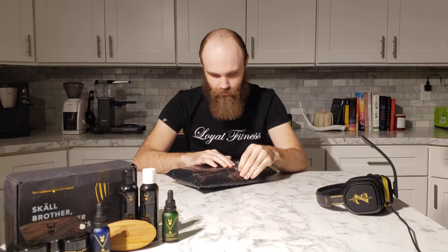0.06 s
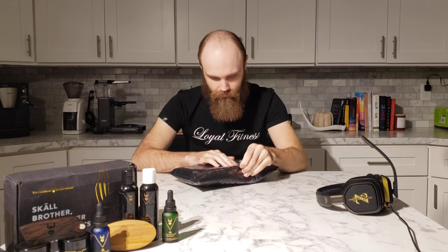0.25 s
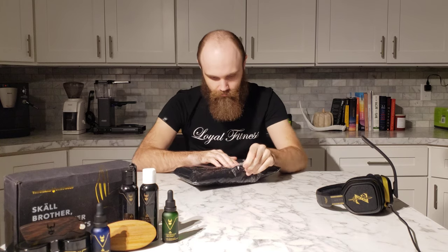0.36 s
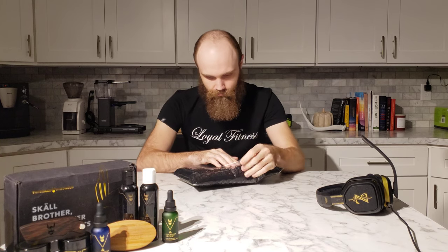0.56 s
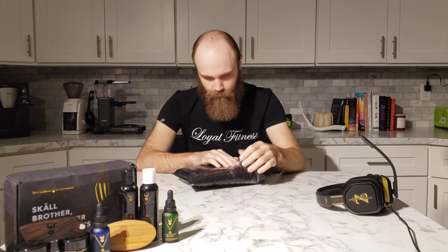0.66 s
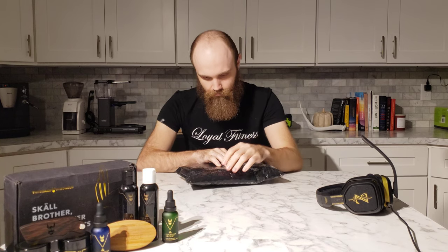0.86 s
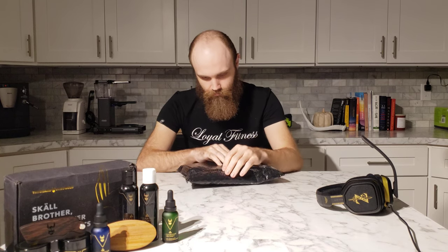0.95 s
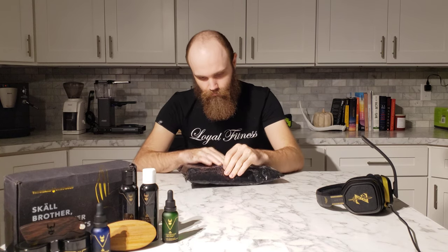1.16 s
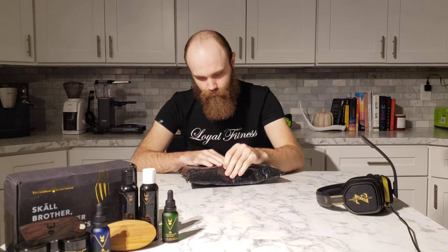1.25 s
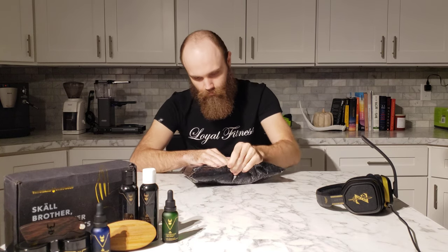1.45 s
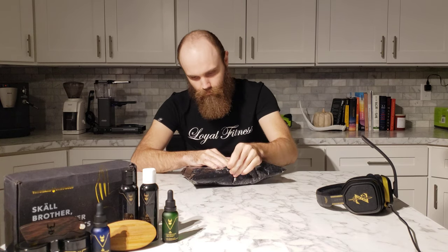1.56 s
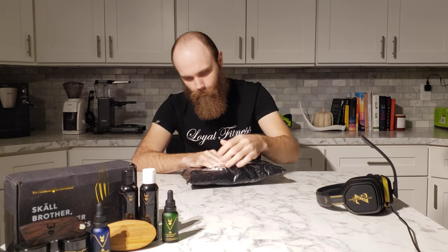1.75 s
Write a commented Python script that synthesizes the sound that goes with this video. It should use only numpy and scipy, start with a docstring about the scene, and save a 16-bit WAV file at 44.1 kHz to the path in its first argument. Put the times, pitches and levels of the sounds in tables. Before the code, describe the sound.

A plastic mailer bag is gripped and pulled: soft rustling and dull pops, a burst of sharp crackling snaps, a quieter stretch of tiny ticks, then another burst; close microphone with short hard kitchen echo.

```python
"""Hands grip and pull at a plastic mailer bag on a kitchen counter: noise slides and tiny clicks crinkle throughout.
Slack panels soon flop over with dull pops, as decaying tones of sagging pitch; faint snaps and dry ticks follow.
After 0.24 s creases buckle in a cluster of sharp snaps, coloured noise bursts that jolt the film,
and a taut panel twice twangs in decaying modes. A sparse stretch leads to a second cluster of snaps
at 1.3 to 1.5 s, then late flops and a faint snap. Decaying noise gives the hard kitchen's echo."""
import sys
import numpy as np
from scipy import signal
from scipy.fft import rfft, irfft
from scipy.io import wavfile
from scipy.ndimage import uniform_filter1d, minimum_filter1d

SR = 44100
rng = np.random.default_rng(int(sys.argv[2]) if len(sys.argv) > 2 else 0)


def unload_audio(sound):
    """Save the sound as a 16-bit wav file, at the path given as the first command line argument."""
    columns = np.transpose(np.atleast_2d(sound))
    # keep every value between -1 and 1, then stretch to whole-number steps
    steps = np.round(np.clip(columns, -1, 1) * 32767)
    wavfile.write(sys.argv[1], SR, steps.astype(np.int16))


N = 79380  # samples: 1.8 s

# Levels of short sounds compare their energy with that of 1 ms at rms 1.
# Buckling creases: (time [s], crack level [dB], ring of the crease [Hz], brightness [dB/octave],
# jolt of the film [dB])
CREASE_SNAPS = [ (0.0631, -39.5, 13600, -6, -36), (0.1682, -25.5, 11800, 1, -33),
                (0.2362, -30, 3800, -1, -32), (.2450, -17, 2750, -2.5, -18), (0.2475, -11.5, 7300, 0, -17),
                (0.2497, -8, 7300, 2.5, -11.5), (0.258, -6.5, 7100, 0, -11.5), (.3510, -2, 7170, 1, -46),
                (0.3622, -14.5, 2520, 0.5, -14), (0.3833, -3, 7000, -3.5, -8.5),
                (0.3874, -9.5, 8600, -4.5, -6.5), (.3890, -7.5, 6900, -1, -7.5),
                (0.3906, -12.5, 8900, -3.5, -12), (0.3926, -5.5, 9040, 4, -7.5),
                (0.671, -47, 9000, 6, -35.5), (0.7014, -39.5, 3940, 0.5, -30.5),
                (1.081, -35, 5900, -0.5, -39), (1.1297, -37, 5960, -2.5, -37.5),
                (1.3078, -27.5, 5000, -1, -33), (1.3111, -27, 6700, 0.5, -30), (1.342, -14, 6100, 0.5, -23),
                (1.3451, -9, 6100, -3, -13.5), (1.3523, -9.5, 3050, 1, -16.5), (1.4028, -11, 2580, -2, -13),
                (1.4051, -8.5, 2500, -0.5, -7.5), (1.4096, -7.5, 6030, -4.5, -14),
                (1.4125, -10, 7200, 3, -25), (1.4314, -4, 1850, 0, -5.5), (1.4583, -17.5, 8200, -0.5, -6),
                (1.4613, -4.5, 7000, -1.5, -2.5), (1.7570, -25, 3150, 3, -42)]
# Spectrum of a cracking crease: (frequency [Hz], relative level [dB])
CRACK_SPECTRUM = [(200, -32), (1000, -20), (2200, -3.5), (4500, -4.5), (7500, -2.5), (10000, -9),
                  (13500, -3.5), (16000, -16.5)]
# Spectrum of sliding friction: (frequency [Hz], relative level [dB])
SLIDE_SPECTRUM = [(60, 2), (150, -2), (330, 1), (680, 4), (1300, -2.5), (2500, -10), (7000, -13.5),
                  (15500, -17)]
CRACK_DECAY_S, JOLT_DECAY_S = 0.00038, 0.00071
PANEL_RISE_S = 0.00038  # onset of flops and twangs


def amp(db):
    """Amplitude ratio: 20 dB per factor of ten."""
    return 10 ** (np.asarray(db) / 20)


def evened(x):
    """Power normalization to rms 1."""
    return x / np.sqrt(np.mean(x ** 2) + 1e-20)


def packed(x):
    """Energy normalization to that of one millisecond at rms 1."""
    return x / np.linalg.norm(x) * np.sqrt(SR / 1000)


def read(points, hz, axis=1):
    """Linear interpolation of a table column on a log-frequency axis."""
    table = np.transpose(points)
    return np.interp(np.log(hz + 1), np.log(table[0] + 1), table[axis])


def add(mix, s, sound):
    """Superposition: a sound joins the mix, in place, at time s [s]."""
    part = mix[max(round(s * SR), 0):][:len(sound)]
    part += sound[:len(part)]


def causal(db):
    """Minimum-phase response: folding the cepstrum packs the energy as early as these gains allow."""
    cepstrum = irfft(np.log(amp(db)))
    half = len(cepstrum) // 2
    cepstrum[1:half] *= 2
    cepstrum[half + 1:] = 0
    return np.exp(rfft(cepstrum))


def grid(size=2048):
    """Discrete time [s] and frequency [Hz] axes of one short sound."""
    return np.arange(size) / SR, np.fft.rfftfreq(size, 1 / SR)


def burst(db, decay_s):
    """Stick-slip: a flurry of tiny slips swells and dies within moments, coloured by the film."""
    evenness = 0.57  # 0 leaves the noise spectrum ragged, 1 nearly flattens it
    t, hz = grid()
    swell = np.sqrt(t) * np.exp(-t / decay_s)
    slips = rfft(rng.standard_normal(len(t)) * swell)
    magnitude = abs(slips)
    slips /= (magnitude + magnitude.mean() / 10) ** evenness
    coloured = irfft(slips * causal(db))
    return packed(np.roll(coloured, len(t) // 128))  # a short lead keeps the wrapped onset


def noise(spectrum):
    """Spectral shaping of steady random noise, at rms 1."""
    gain = amp(read(spectrum, np.fft.rfftfreq(N, 1 / SR)))
    return evened(irfft(rfft(rng.standard_normal(N)) * gain, N))


def handling(axis):
    """Amplitude modulation: gain over time from one column of the handling curve."""
    # Strength of the handling: (time [s], crinkle level [dB], sliding level [dB])
    curve = [(0, -51, -53.5), (.09, -57.5, -62), (0.188, -47.5, -52), (.3, -47, -47.5), (.42, -42.5, -50.5),
             (0.631, -55.5, -51), (0.718, -54, -50), (.84, -65, -63), (0.962, -60.5, -56.5),
             (1.05, -73, -58.5), (1.172, -56.5, -57), (1.28, -54, -59), (1.461, -33, -57), (1.62, -52, -49),
             (1.8, -51, -48)]
    table = np.transpose(curve)
    return amp(np.interp(np.arange(N) / SR, table[0], table[axis]))


def hush():
    """Stationary background noise of the room."""
    # Spectrum of the hush: (frequency [Hz], relative level [dB])
    hush_spectrum = [(20, 1.5), (38, 0), (85, -8), (150, 1.5), (300, -15), (16000, -38)]
    return amp(-69.5) * noise(hush_spectrum)


def sliding():
    """Sliding friction: fingers and bag rub softly as broadband noise."""
    return noise(SLIDE_SPECTRUM) * handling(axis=2)


def wrinkle(centre_hz):
    """Band-limited impulse: the dry tick of one small wrinkle, in the band set by its size."""
    half_width = 0.69  # octaves to the -6 dB points
    t, hz = grid()
    octaves = np.log2((hz + 1) / centre_hz)
    band = -20 * np.log10(1 + (octaves / half_width) ** 4)
    return burst(read(CRACK_SPECTRUM, hz) + band, CRACK_DECAY_S / 2)


def crinkles(count=30):
    """Poisson-like crackling: still smaller wrinkles give way at random while the bag is handled."""
    # Spectrum of the crinkling: (frequency [Hz], relative level [dB])
    crinkle_spectrum = [(700, 1.5), (2500, -12), (6000, 0.5), (9000, -8), (14500, -3)]
    rate_per_s, spread_db = 900, 5.5  # total rate over all bands; spread per unit of random size
    out = np.zeros(N)
    for centre_hz in np.geomspace(crinkle_spectrum[0][0], crinkle_spectrum[-1][0], count):
        happens = rng.random(N) < rate_per_s / count / SR
        size = np.minimum(rng.exponential(1, N), 2.6)
        clicks = happens * amp(spread_db * size + read(crinkle_spectrum, centre_hz))
        out += signal.oaconvolve(clicks, wrinkle(centre_hz))[:N]
    return evened(out) * handling(axis=1)


def flops():
    """Damped oscillation: a slack panel swings briefly with a rustle, its pitch sagging as it relaxes."""
    # Slack panels flopping over, and at 0.868 s a soft low rub of the bag: (time [s], level before doubling the
    # amplitude [dB], middle of the pitch glide [Hz])
    panel_flops = [(.011, -44, 730), (0.0673, -37.5, 700), (0.067, -41.5, 298), (.1559, -37, 1090),
                   (.1573, -32.5, 1020), (0.207, -26.5, 644), (0.2314, -30.5, 443), (.290, -32.5, 350),
                   (.5480, -41, 414), (0.57, -39.5, 640), (.7018, -34, 855), (0.7046, -37, 390),
                   (.7494, -38, 630), (.868, -51, 164), (0.9838, -43, 810), (1.084, -39, 750),
                   (1.1599, -41, 1000), (1.4690, -24, 820), (1.688, -41, 684), (1.7505, -35, 810),
                   (1.7579, -29.5, 720), (1.7606, -30.5, 700), (1.7578, -32.5, 356)]
    decay_cycles, sag, rustle_db = 0.88, 0.15, -12  # sag: fraction above and below the middle pitch
    out, (t, hz) = np.zeros(N), grid()
    for s, db, pitch_hz in panel_flops:
        tension = np.exp(-t * pitch_hz / decay_cycles)
        turns = np.cumsum(pitch_hz * (1 + sag * (2 * tension - 1))) / SR
        swing = np.sin(2 * np.pi * turns) * tension * (1 - np.exp(-t / PANEL_RISE_S))
        add(out, s, amp(db) * 2 * packed(swing))
        rustle = burst(read(SLIDE_SPECTRUM, hz) + read(CRACK_SPECTRUM, hz), JOLT_DECAY_S)
        add(out, s, amp(db + rustle_db) * 2 * rustle)
    return out


def snaps():
    """Buckling: each crease cracks and jolts the film; its resonance is heard only head-on.

    Rows: head-on, into the room."""
    # Spectrum of the film's jolt: (frequency [Hz], relative level [dB])
    jolt_spectrum = [(50, -36), (120, -23.5), (250, -9.5), (550, 1.5), (900, 4.5), (1300, 5), (1900, -6.5),
                     (3500, -14.5)]
    ring_db, ring_octaves = 10, 0.18  # height and width of the resonance
    out, (t, hz) = np.zeros((2, N)), grid()
    lead = len(t) // 128 / SR  # the lead that burst() puts before its onset
    for s, crack_db, ring_hz, brightness, jolt_db in CREASE_SNAPS:
        octaves = np.log2(np.maximum(hz, 1000) / ring_hz)  # tilt levels off below 1 kHz
        crack = burst(read(CRACK_SPECTRUM, hz) + brightness * octaves, CRACK_DECAY_S)
        resonance = causal(ring_db * np.exp(-(octaves / ring_octaves) ** 2))
        ringing = packed(irfft(rfft(crack) * resonance))
        jolt = amp(jolt_db) * burst(read(jolt_spectrum, hz), JOLT_DECAY_S)
        add(out[0], s - lead, amp(crack_db) * ringing + jolt)
        add(out[1], s - lead, amp(crack_db) * crack + jolt)
    return out


def ticks():
    """Local buckling: single wrinkles give way, too small to jolt the film."""
    # Single small wrinkles: (time [s], level [dB], centre of the band [Hz])
    small_wrinkles = [(.1066, -28.5, 6070), (0.5396, -31.5, 6160), (0.5687, -37, 11000), (.7485, -47, 2840),
                      (.789, -46, 7900), (0.796, -43, 8350), (0.921, -51, 13800), (.9375, -53.5, 11100),
                      (1.008, -50, 14000), (1.1508, -47, 6000), (1.169, -50, 9900), (1.2428, -49, 4000),
                      (1.261, -51, 7000), (1.2998, -42, 6500), (1.681, -38, 5000)]
    out = np.zeros(N)
    for s, db, centre_hz in small_wrinkles:
        add(out, s, amp(db) * wrinkle(centre_hz))
    return out


def panel():
    """Modal superposition: a taut panel flips through and twangs in its lowest bending modes."""
    # Taut panel flipping through: (time [s], gain on the modes [dB])
    flips = [(.2577, -10), (.3510, -1.5)]
    # Bending modes of the panel: (frequency [Hz], relative level [dB])
    modes = [(660, -7.5), (2170, -12), (4250, -20.5)]
    t60_s = 0.0089  # ring time to -60 dB
    out, (t, hz) = np.zeros(N), grid()
    swing = np.exp(-np.log(1000) * t / t60_s) * (1 - np.exp(-t / PANEL_RISE_S))
    twang = sum(amp(db) * packed(np.cos(2 * np.pi * mode_hz * t) * swing) for mode_hz, db in modes)
    for s, db in flips:
        add(out, s, amp(db) * twang)
    return out


def tail():
    """Diffuse reverberation: lumpy echoes from cupboards and tiles, each band with its own decay."""
    # Kitchen reverberation: (frequency [Hz], reverberation time [s], energy level of the tail [dB])
    reverberation = [(120, 0.24, -12.5), (440, 0.38, -7), (1100, 0.28, -6), (2860, 0.33, -6.5),
                     (7000, 0.39, -9.5), (15200, 0.25, -10)]
    lumps_db, build_s = 4.3, 0.0023  # unevenness (rms) and onset of the echoes
    lumps = amp(lumps_db * evened(uniform_filter1d(rng.standard_normal(SR), size=40)))
    echoes = evened(rng.standard_normal(SR) * lumps)
    hz, t, z = signal.stft(echoes, SR, nperseg=256)
    t60 = read(reverberation, hz)[:, None]
    level_db = read(reverberation, hz, axis=2)[:, None]
    unit_energy = np.sqrt(2 * np.log(1000) / t60 / SR)  # offsets the energy of a longer decay
    z *= amp(level_db - 60 * t / t60) * unit_energy
    decaying = signal.istft(z, SR, nperseg=256)[1][:SR]
    return decaying * np.minimum(np.arange(SR) / SR / build_s, 1)


def kitchen(x, count=3):
    """Convolution reverberation: partly shared tails take turns as each crease faces another way.

    Two discrete reflections come from near surfaces."""
    # Near surfaces: (delay [s], level [dB])
    near_surfaces = [(.007, -23), (0.0245, -18)]
    share = 0.4  # fraction of echo energy common to all facings
    facing = np.searchsorted([row[0] for row in CREASE_SNAPS], np.arange(N) / SR) % count
    common, out = tail(), np.zeros(N)
    for k in range(count):
        part = x * uniform_filter1d(1. * (facing == k), size=16)  # short crossfade
        echo = np.sqrt(share) * common + np.sqrt(1 - share) * tail()
        out += signal.fftconvolve(part, echo)[:N]
    for delay_s, db in near_surfaces:
        add(out, delay_s, amp(db) * x)
    return out


def scene():
    """Radiation limit: the bag is too small to radiate bass; echo, sliding and hush join it."""
    bag = snaps() + panel() + flops() + ticks() + crinkles()
    bass_cut = signal.butter(3, 135, "high", fs=SR, output="sos")  # Hz
    direct, spread = signal.sosfilt(bass_cut, bag)
    return (direct + kitchen(spread) + sliding() + hush())[None]


def record(dry):
    """Gain reduction and band limiting: a fast limiter holds the loudest snaps, then a low-pass."""
    ceiling, edge_hz = 0.87, 16000  # ceiling: peak amplitude ahead of the low-pass
    needed = 1 / np.maximum(abs(dry) / ceiling, 1)
    gain = uniform_filter1d(minimum_filter1d(needed, size=111), size=71)  # acts ahead of the peak
    low_pass = signal.firwin(255, edge_hz, window=("kaiser", 8), fs=SR)
    return signal.oaconvolve(dry * gain, low_pass[None], "same")


dry = scene()
out = record(dry)
unload_audio(out)
```